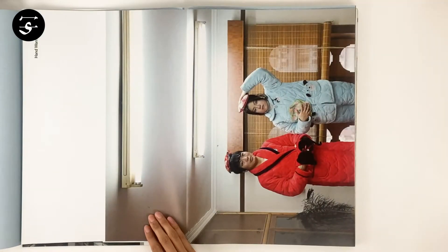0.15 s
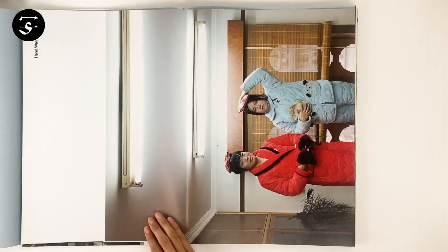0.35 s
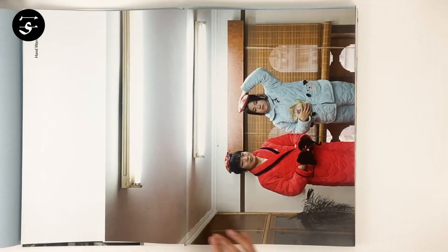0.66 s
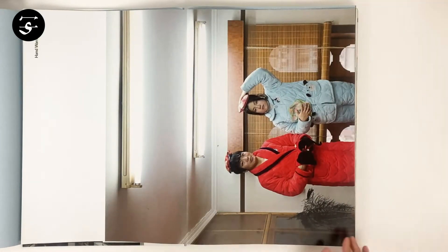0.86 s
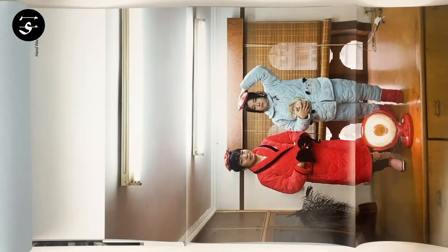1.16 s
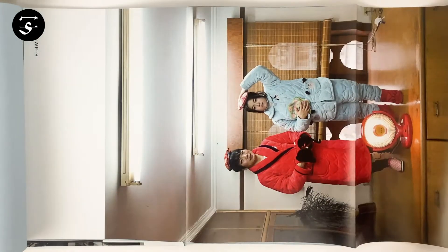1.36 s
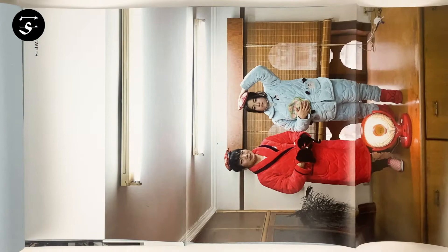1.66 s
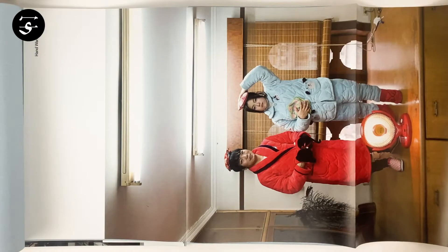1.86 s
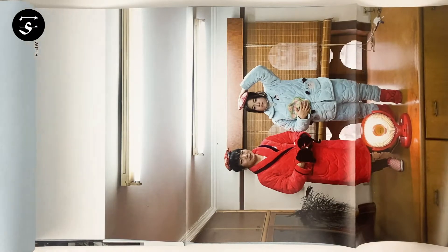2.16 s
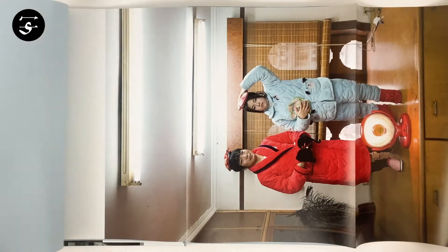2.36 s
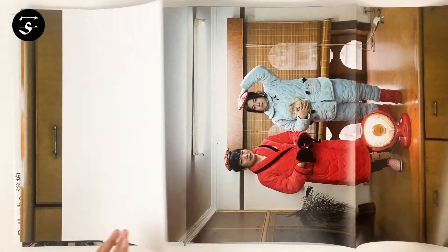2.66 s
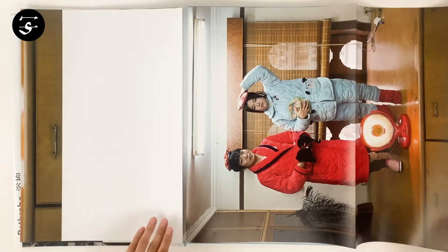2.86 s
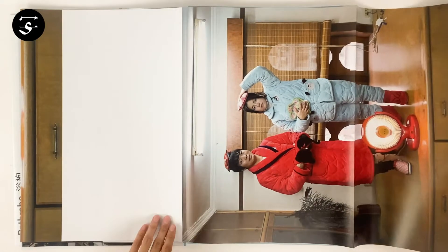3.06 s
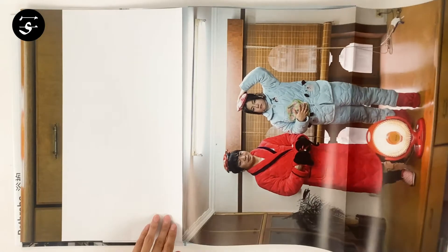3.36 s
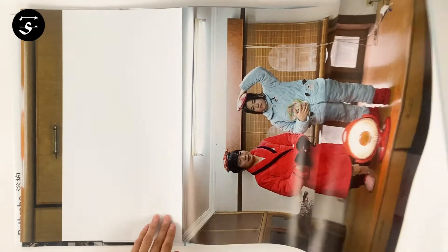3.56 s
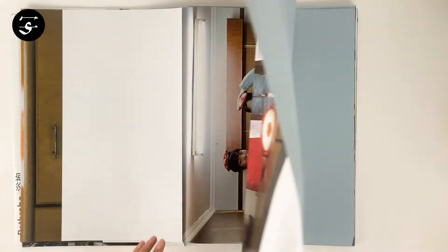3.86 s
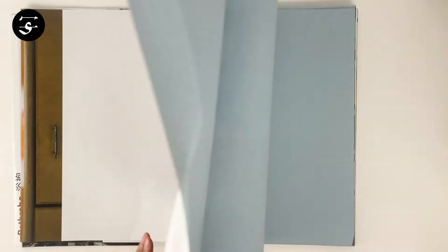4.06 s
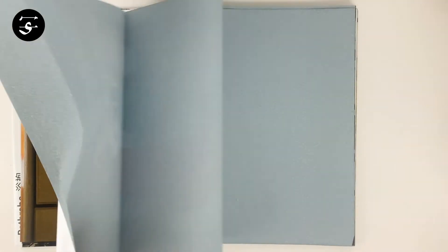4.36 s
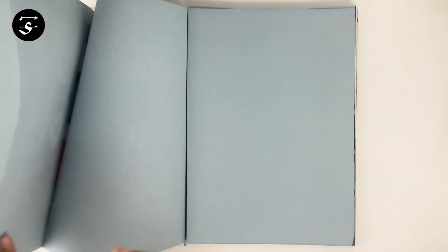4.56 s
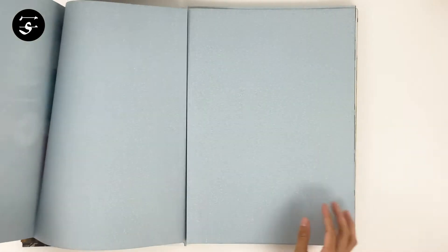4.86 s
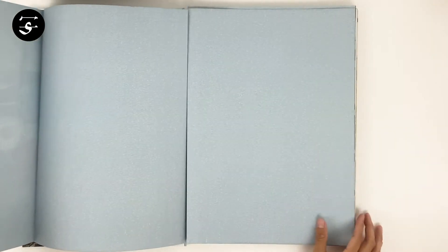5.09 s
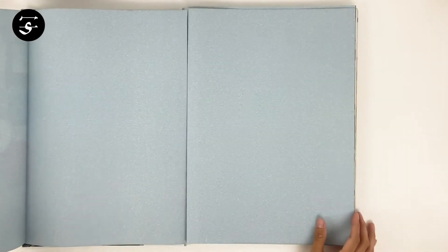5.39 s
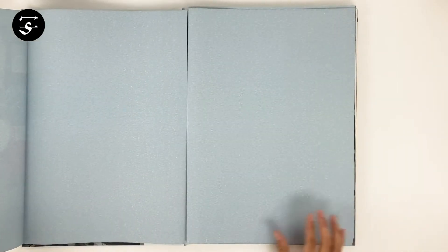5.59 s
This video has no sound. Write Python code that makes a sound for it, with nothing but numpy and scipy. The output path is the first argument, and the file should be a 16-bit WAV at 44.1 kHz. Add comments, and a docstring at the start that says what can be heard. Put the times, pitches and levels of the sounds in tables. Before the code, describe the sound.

Large glossy pages are handled on a table indoors, close to a stereo microphone. At the very start a paper edge taps the table and fingers stroke the page with a thin swish, while a faint hiss begins to fade. From 1 second the paper slides in short, soft strokes with a grainy hiss, and creases snap in small clusters around 1.3 and 2.2 seconds. Near 3 seconds an edge knocks sharply, followed by more uneven sliding and rustling that eases around 4 seconds. At 4.5 seconds a burst of knocks and pops leads into the loudest slide, strongest from about 4.8 to 5.2 seconds, as the sheets swing over. It fades, and one last small snap comes at 5.5 seconds. Throughout, machines hum quietly in the room, the air rumbles and a low drone wavers.

```python
"""Large glossy sheets are unfolded and swung over by hand on a table, close to a stereo microphone. First a
finger taps and fingers stroke the page, while a faint hiss starts to fade. From 1 s on the paper slides with a
grainy hiss and creases snap; near 3 s an edge knocks sharply. At 4.5 s a burst of knocks leads into the loudest
slide, and one last small snap follows at 5.5 s. All along, machines hum in the room, the air rumbles and a low
drone wavers."""
import sys
import numpy as np
from scipy import signal
from scipy.fft import rfft, irfft, next_fast_len
from scipy.io import wavfile
from scipy.ndimage import uniform_filter1d, map_coordinates

SR = 44100
rng = np.random.default_rng(int(sys.argv[2]) if len(sys.argv) > 2 else 0)


def file_out(sig):
    """Save sig as 16-bit WAV at sys.argv[1]."""
    # one column per channel
    cols = np.atleast_2d(sig).T
    # limit, then scale
    lim = np.clip(cols, -1, 1)
    pcm = np.round(lim * 32767).astype(np.int16)
    wavfile.write(sys.argv[1], SR, pcm)


N = 252693

# Where a sheet rings when little of it hangs free: f/Hz, width/Hz, level/dB
SHORT_SHEET_MODES = [(1042, 404, -1.1), (1900, 495, -1.8), (2675, 640, -2.04)]
# Tone colour of the paper's fine hiss: f/Hz, level/dB
HISS_COLOUR = [(2120, -10.5), (3600, -8), (3900, -2.5), (4830, 0), (6120, -5), (6920, -3.5), (8730, -4.5),
               (12200, -11.5), (15500, -19.5)]
# How alike the paper sounds on the left and right: f/Hz, likeness (1 = the same)
PAPER_LIKENESS = [(150, 1), (380, 0.97), (950, 0.73), (2380, 0.44), (5000, 0.68), (9000, 1), (15000, .85)]
# How alike the room's air sounds on the left and right: f/Hz, likeness (1 = the same)
AIR_LIKENESS = [(100, .9999), (170, 0.98), (300, 0.65), (550, 0), (5000, 0), (15000, 1)]


def sliding_paper():
    """Fibres catch and slip: the rub rings the sheet, tiny catches hiss, the moving sheet flutters."""
    # One slide a row: t/s, rise/s, hold/s, fall/s, rub level as the hold starts/dB and as it ends/dB,
    # hiss above the rub/dB, flutter above the rub/dB
    slides = [(0.99, 0.024, .005, 0.13, -70, -70.5, 0, 6), (1.142, 0.011, 0.0046, 0.093, -65, -66, -22, -1),
              (1.208, 0.0091, 0.058, .04, -60, -73.5, 3, -4),
              (1.283, 0.0064, 0.097, 0.19, -66.5, -63.5, -5.5, -7),
              (1.549, 0.047, .02, 0.18, -62.5, -62, -10, -17),
              (1.842, 0.052, 0.098, 0.11, -73.5, -65.5, -13, -12),
              (2.128, 0.0091, 0.017, .03, -58.5, -63, -15, -17),
              (2.165, 0.0067, 0.15, .03, -68.5, -72, -15, -5.5),
              (2.298, 0.017, 0.1, .02, -72, -72.5, -10, -10),
              (2.413, .04, 0.022, 0.047, -72.5, -73.5, 2, -8),
              (2.481, 0.037, 0.084, 0.044, -62.5, -63, 2, -7), (2.673, 0.13, 0.19, .04, -61, -64, -8, -16),
              (2.956, 0.029, .045, 0.076, -50.5, -52.5, -3, -10.5),
              (3.092, 0.028, .2, 0.097, -63.5, -57.5, -5, -14.5),
              (3.132, 0.0083, .012, .03, -61.5, -66, 2, -15), (3.165, 0.013, .02, .04, -58, -61, 2, -12),
              (3.25, 0.029, 0.014, .04, -59, -60, -3.5, -18),
              (3.289, 0.019, 0.016, 0.054, -57.5, -59, -4, -15),
              (3.401, 0.013, 0.047, 0.04, -65.5, -69, -3, -3.5),
              (3.444, .012, 0.047, 0.078, -56.5, -60.5, -2.5, -8),
              (3.49, .03, 0.028, 0.1, -56, -56.5, -0.5, -9),
              (3.636, .015, 0.045, 0.033, -72, -73.5, 2.5, -1),
              (3.702, 0.0056, 0.21, 0.11, -66, -69, 4, -15.5),
              (3.944, 0.025, 0.2, 0.04, -80.5, -73.5, -9, -10),
              (4.22, 0.047, 0.021, 0.077, -64.5, -75, -11, -6),
              (4.355, 0.0093, .11, 0.047, -63, -52.5, 2, -24),
              (4.494, .008, 0.048, 0.099, -47, -53, -9.5, 7.5),
              (4.499, 0.053, 0.066, 0.036, -56.5, -56, -4, 2), (4.639, .008, 0.035, .04, -50, -60, -7, 8),
              (4.657, 0.038, 0.097, 0.036, -48.5, -43, -9.5, -8),
              (4.791, .01, 0.092, 0.081, -37, -41, -7, -15.5),
              (4.852, 0.049, .14, 0.092, -42.5, -43, -2.5, -31),
              (5.06, .05, 0.082, 0.045, -49.5, -45, -7.5, -11.5),
              (5.162, 0.011, 0.21, 0.13, -43, -64, -6, -21),
              (5.399, 0.032, 0.11, 0.046, -58, -73.5, -10.5, -6),
              (5.527, .008, 0.048, 0.05, -62, -69.5, -6, -4)]
    # Where a sheet rings when more of it hangs free: f/Hz, width/Hz, level/dB
    long_sheet_modes = [(528, 62, -7), (717, 21, -2.5), (860, 41, 1.5), (1025, 56, -0.5), (1505, 470, -6),
                        (2950, 700, -6)]
    # How much of the rub rings like the short sheet: t/s, share (0 to 1)
    short_share = [(1, 0.87), (2.2, 0.84), (2.8, 0.95), (3.6, 1), (4.3, 0.35), (4.7, 0.35), (4.9, 0.01),
                   (5.3, 0.45), (5.5, 0.62)]
    # Tone colour of the low flutter: f/Hz, level/dB
    flutter_colour = [(150, -0.5), (260, -4.5), (380, -5), (520, 3.5), (750, 0.5), (1200, -40)]
    power_shares = amp(2 * np.array([(0, *row[6:]) for row in slides]))  # rub, hiss, flutter
    stroke_power = np.array(list(stroke_gains(slides))) ** 2
    rub_gain, hiss_gain, flutter_gain = np.sqrt(power_shares.T @ stroke_power)
    short = np.clip(curves(short_share)[0], 0, 1)
    uneven_grip = amp(1.88 * wobble(40))
    long_rub = noise(ringing(long_sheet_modes), PAPER_LIKENESS, patchy_db=4.0, grain_db=-2.0)
    short_rub = noise(ringing(SHORT_SHEET_MODES), PAPER_LIKENESS, patchy_db=4.0, grain_db=0.24)
    rub = np.sqrt(1 - short) * long_rub + np.sqrt(short) * short_rub
    hiss = noise(coloured(HISS_COLOUR), PAPER_LIKENESS, patchy_db=3.5, grain_db=0.0)
    flutter = noise(coloured(flutter_colour), PAPER_LIKENESS, patchy_db=2.5, grain_db=3.0)
    balance = amp([[0.3], [-0.3]])  # a little louder on the left
    return uneven_grip * balance * (rub_gain * rub + hiss_gain * hiss + flutter_gain * flutter)


def crease_snaps():
    """A crease lets go with one sharp pop, then the sheet shivers and falls quiet."""
    # One crease a row: t/s, level/dB, extra for the sheet's ring/dB, extra for the pop/dB
    creases = [(1.137, -55, 4.5, -1), (1.214, -38.5, -14, -5), (1.282, -46, 1, -2), (1.338, -51, -7, 3),
               (1.3464, -61, -12, 4), (1.355, -64, 9, 0), (1.368, -52, -3, 7.5), (1.384, -59, -2, 11),
               (1.41, -61.5, 13, -2), (1.594, -59, -4, 7), (2.132, -62, 13, -1), (2.159, -44.5, 6, -23),
               (2.1939, -53, 9, -8), (2.2164, -50, 5, -1), (2.2313, -52, 10, -6), (2.3134, -57, 1, -3),
               (3.096, -42, -14, -7), (3.4169, -57, 11, -5), (3.4549, -58, 5, -3), (4.355, -55.5, 7.5, -4),
               (4.4965, -42.5, 12, -7), (4.55, -45, -9, -5), (4.633, -37.5, 7.5, 1.5),
               (4.6763, -52, 10, -4), (4.7904, -44, 13.5, 3), (5.528, -59.5, 11, 4)]
    # Tone colour of the pop's crack: f/Hz, level/dB
    crack_colour = [(1500, -12), (3500, -24), (6000, 14.5), (12000, 12.5), (16000, -15)]
    treble_db, body_db, crack_db, pop_ring_db = -11.5, -12.5, -1, 22.5  # the mix of the four parts
    t = np.arange(SR // 4) / SR
    shiver = amp(-60 * t / 0.069) * (1 - np.exp(-t / 0.00045))  # jumps up, loses 60 dB in 69 ms
    treble_gain, body_gain = np.zeros((2, N + SR))
    pulses = np.zeros((2, N))
    for start, db, ring_db, pop_db in creases:
        at = round(start * SR)
        treble_gain[at:at + len(t)] += amp(db + treble_db) * shiver
        body_gain[at:at + len(t)] += amp(db + ring_db + body_db) * shiver
        pulses[:, at + 20] = amp(db + pop_db + np.array([crack_db, ring_db + pop_ring_db]))
    crack = filtered(pulses[0], coloured(crack_colour))
    pop_ring = filtered(pulses[1], ringing(SHORT_SHEET_MODES))
    treble = noise(coloured(HISS_COLOUR), PAPER_LIKENESS, patchy_db=2.5, grain_db=2.5)
    body = noise(ringing(SHORT_SHEET_MODES), PAPER_LIKENESS, patchy_db=-4.0, grain_db=2.0)
    return crack + pop_ring + treble_gain[:N] * treble + body_gain[:N] * body


def edge_knocks():
    """A sheet's edge hits the table, or at the start a finger taps, and both ring with a few short tones."""
    # One knock a row: t/s, level/dB, f/Hz, time to fade by 60 dB/s
    knocks = [(.05, -50, 1514, .04), (0.058, -42, 1024, 0.041), (.069, -47.5, 417, 0.046),
              (.997, -51.5, 953, 0.048), (1.137, -45, 497, 0.0079), (1.215, -49, 1110, 0.027),
              (2.632, -56, 450, 0.035), (2.645, -49, 389, 0.021), (2.9697, -24.5, 1003, 0.012),
              (2.9766, -37, 752, 0.044), (3.411, -48, 1077, 0.036), (4.4988, -22, 673, 0.018),
              (4.506, -23, 917, 0.02), (4.515, -31, 826, 0.057), (4.532, -34, 1115, 0.036),
              (4.546, -31.5, 924, 0.028), (4.634, -23, 520, 0.035), (4.635, -26.5, 257, 0.056),
              (4.66, -32, 290, 0.07), (5.528, -48, 1205, 0.02)]
    # The tones in a knock: multiple of its pitch, level/dB, share of its fade time
    knock_tones = [(1, -1.5, 1), (2.05, -18.5, 0.83), (.55, -10.5, 0.74), (1.3, -7.5, 1.01)]
    out, t = np.zeros(N + SR), np.arange(SR // 4) / SR
    soft_onset = 1 - np.exp(-t / 0.00091)
    for start, db, hz, fade_s in knocks:
        ring = np.zeros(len(t))
        for multiple, tone_db, share in knock_tones:
            fade_db = 60 * t / max(fade_s * share, .003)
            ring += amp(tone_db + rng.normal(0, 1.6) - fade_db) * np.sin(2 * np.pi * hz * multiple * t)
        out[round(start * SR):][:len(t)] += amp(db) * ring * soft_onset
    return out[:N]


def finger_swish():
    """Skin drags over the glossy coating with a thin swish."""
    # One stroke a row: t/s, rise/s, hold/s, fall/s, level as the hold starts/dB and as it ends/dB
    finger_strokes = [(-.02, 0.018, 0.052, 0.21, -60.5, -57), (.1, 0.065, 0.094, .06, -71, -64.5),
                      (.25, .03, 0.19, 0.061, -66, -72.5), (.52, .11, .01, 0.13, -64, -70)]
    # Tone colour of skin on the coating: f/Hz, level/dB
    gloss_colour = [(1290, -10.5), (2200, -6.5), (2680, -2), (2900, -1.5), (3830, -4), (4440, -4.5),
                    (5540, -5.5), (6010, -12), (7250, -4.5), (8820, -10), (13600, -12), (14500, -19),
                    (15500, -31)]
    drag = np.linalg.norm(list(stroke_gains(finger_strokes)), axis=0)
    return drag * noise(coloured(gloss_colour), PAPER_LIKENESS, patchy_db=-2.0, grain_db=0.9)


def room_echo(x):
    """The room answers a moment later, and each frequency dies away at its own speed."""
    # How long the room rings: f/Hz, time to fade by 60 dB/s
    fade_times = [(200, 0.025), (2000, 0.13), (10000, 0.027)]
    hz, t, spectrum = signal.stft(rng.standard_normal((2, SR // 2)), SR, nperseg=256)
    fade = amp(-60 * t / along(fade_times, hz)[:, None])
    tail = signal.istft(spectrum * fade, SR, nperseg=256)[1]
    delayed = np.pad(x, ((0, 0), (250, 0)))
    return signal.fftconvolve(delayed, tail / np.linalg.norm(tail[0]), axes=1)[:, :N]


def machine_hum(t):
    """Machines hum with two nearly steady tones."""
    # The hum's tones: f/Hz, level/dB
    tones = [(119.5, -57), (140.5, -59)]
    return sum(amp(db + 0.32 * wobble(15.0)) * np.sin(2 * np.pi * hz * t + 0.54 * wobble(2.73))
               for hz, db in tones)


def low_drone():
    """One deep tone wavers in pitch and loudness."""
    # The drone's slow drift: t/s, f/Hz, level/dB
    drift = [(0.0, 71, -51.5), (0.41, 73, -52), (0.62, 62.3, -48.5), (0.97, 66.3, -53), (1.05, 74.3, -48),
             (1.37, 56.1, -62), (2.06, 66.74, -59), (2.26, 61.5, -58), (2.54, 65.9, -57), (3.08, 57, -61.5),
             (3.21, 62.1, -51), (3.33, 53.2, -51), (4.37, 66.66, -51), (4.53, 59.84, -63),
             (4.95, 75.8, -45.5), (5.73, 65.1, -51)]
    hz, db = curves(drift)
    gain = amp(db + 2.8 * wobble(9))
    wavering_hz = hz + 1.79 * wobble(7.6)
    return gain * np.sin(2 * np.pi * np.cumsum(wavering_hz) / SR)


def room_air():
    """The air makes a deep rumble with a soft hush above it."""
    # How loud the air is: t/s, rumble level/dB, hush level/dB
    levels = [(0.0, -51.5, -62), (0.7, -47, -65), (1.1, -51, -66), (2.11, -54, -67), (4.2, -51.5, -66),
              (4.31, -52.5, -66.5), (4.47, -48.5, -59), (5.03, -49, -62.5), (5.73, -53, -65.5)]
    # Tone colour of the rumble: f/Hz, level/dB
    rumble_colour = [(20, -35), (34, -17.5), (44, -14), (56, 4.5), (74, 2), (91, -9), (129, -4.5),
                     (167, -18), (220, -22.5), (330, -34), (430, -79)]
    # Tone colour of the hush: f/Hz, level/dB
    hush_colour = [(150, -28), (250, -1), (400, -7.5), (700, -4.5), (1330, -11.5), (2130, -12), (3200, -16),
                   (3700, -22), (5000, -30), (11800, -40), (12400, -65)]
    rumble_db, hush_db = curves(levels)
    rumble = noise(coloured(rumble_colour), AIR_LIKENESS, patchy_db=0.5, grain_db=3.5)
    hush = noise(coloured(hush_colour), AIR_LIKENESS, patchy_db=4.0, grain_db=0.2)
    return amp(rumble_db) * rumble + amp(hush_db) * hush


def faint_hiss(t):
    """A faint, narrow hiss holds for a moment, then fades ever faster."""
    # Tone colour of this hiss: f/Hz, level/dB
    colour = [(1300, -32), (2000, 0.5), (3000, 2), (3900, 6.5), (4200, -5), (4550, -35)]
    start_db, hold_s = -70.5, 0.63
    gain = amp(start_db - 36 * np.maximum(t - hold_s, 0) ** 2)
    return gain * noise(coloured(colour), AIR_LIKENESS, patchy_db=4.0, grain_db=-0.5)


def stroke_gains(rows, edge_db=25):
    """Each stroke's gain over time: it rises by edge_db, swells or sags, then falls away."""
    t = np.arange(N) / SR
    for start, rise, hold, fall, first_db, last_db, *_ in rows:
        corners = start + np.cumsum(np.clip([0, rise, hold, fall, 2 * fall], 1e-4, None))
        levels = [first_db - edge_db, first_db, last_db, last_db - edge_db, last_db - 3 * edge_db]
        yield amp(np.interp(t, corners, levels, left=-200))


def noise(colour, likeness, patchy_db, grain_db):
    """Stereo noise of strength 1: narrow bands come and go (patchy), the level flickers (grain)."""
    def mid_and_side(hz):
        angle = np.arccos(np.clip(along(likeness, hz), -1, 1)) / 2  # 0 makes left and right the same
        return colour(hz) * [np.cos(angle), np.sin(angle)]

    spectrum = signal.stft(rng.standard_normal((2, N)), nperseg=512)[2]
    patches = uniform_filter1d(rng.standard_normal(spectrum.shape[1:]), size=2, axis=0)
    patches = unit(uniform_filter1d(patches, size=14, axis=1))  # smooth in frequency, then in time
    patchy = signal.istft(spectrum * amp(patchy_db * patches), nperseg=512)[1][:, :N]
    grain = amp(grain_db * wobble(300))
    mid, side = filtered(patchy * grain, mid_and_side)
    return unit(np.array([mid + side, mid - side]))


def ringing(modes):
    """A filter that rings at each mode, a frequency the sheet likes to shake at."""
    return lambda hz: sum((-1) ** k * amp(db) * 1j * hz * width / (f * f - hz * hz + 1j * hz * width)
                          for k, (f, width, db) in enumerate(modes))


def coloured(points):
    """A filter whose gain follows (f/Hz, level/dB) points."""
    return lambda hz: amp(along(points, hz))


def filtered(x, response):
    """Pass x through a filter, given as a function of frequency."""
    size = next_fast_len(N + SR // 2)
    return irfft(rfft(x, size) * response(np.fft.rfftfreq(size, 1 / SR)), size)[..., :N]


def wobble(rate):
    """A smooth random curve through `rate` random values a second."""
    return map_coordinates(rng.standard_normal(int(N * rate / SR) + 4), [np.arange(N) * rate / SR])


def curves(rows):
    """Turn rows that start with a time into one curve for each other column."""
    times, *columns = np.transpose(rows)
    return [np.interp(np.arange(N) / SR, times, column) for column in columns]


def along(points, hz):
    """Read between (f/Hz, value) points on a log frequency scale."""
    f, values = np.transpose(points)
    return np.interp(np.log(hz + 1), np.log(f + 1), values)


def amp(db):
    """Turn decibels into a gain."""
    return 10 ** (np.asarray(db) / 20)


def unit(x):
    """Scale x to an average strength (rms) of 1."""
    return x / np.sqrt(np.mean(x ** 2) + 1e-20)


def scene():
    """Paper close by, a little echo on its sudden sounds, and the room behind it."""
    t = np.arange(N) / SR
    sudden = crease_snaps() + edge_knocks()
    paper = sliding_paper() + finger_swish() + sudden + amp(-7.5) * room_echo(sudden)
    lag_s = .00002  # the paper's sound reaches the left side this much later than the right
    paper = filtered(paper, lambda hz: np.exp(1j * np.pi * hz * lag_s * np.array([[-1], [1]])))
    return paper + machine_hum(t) + low_drone() + room_air() + faint_hiss(t)


def record(dry):
    """The recorder keeps nothing above 15750 Hz."""
    return filtered(dry, lambda hz: hz < 15750)


dry = scene()
out = record(dry)
file_out(out)
```